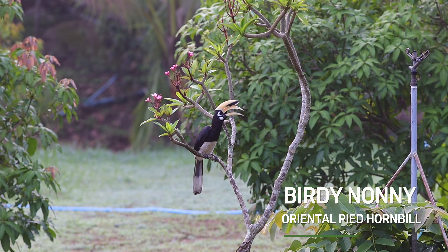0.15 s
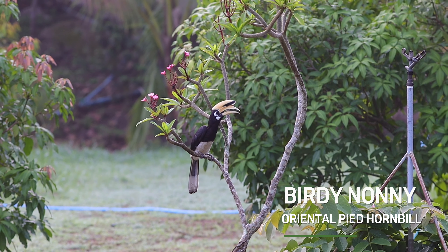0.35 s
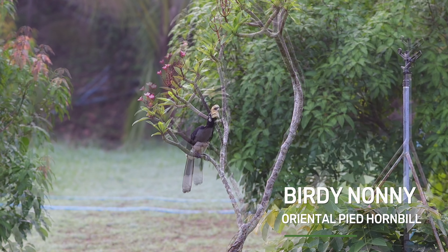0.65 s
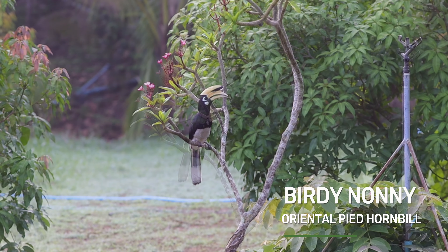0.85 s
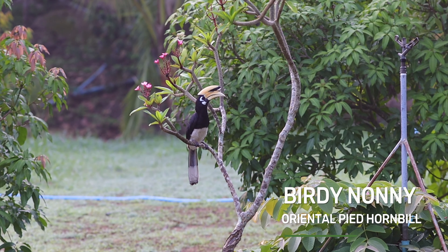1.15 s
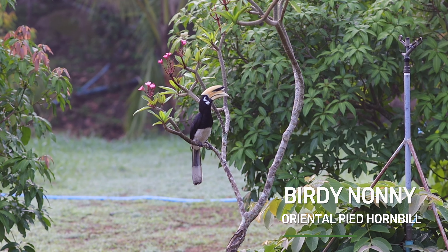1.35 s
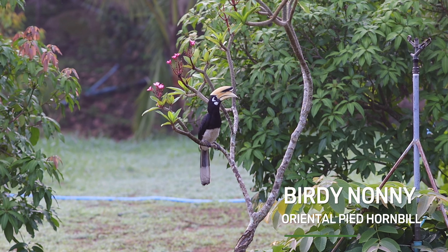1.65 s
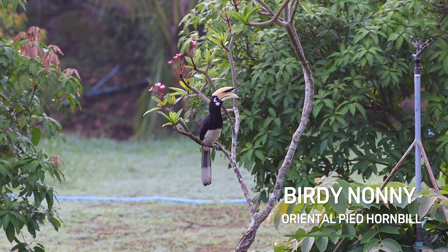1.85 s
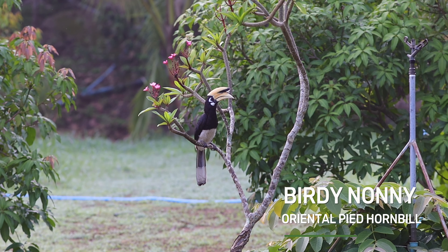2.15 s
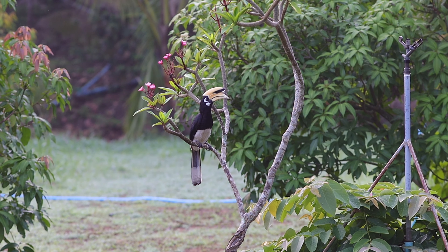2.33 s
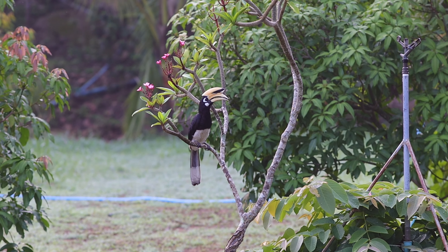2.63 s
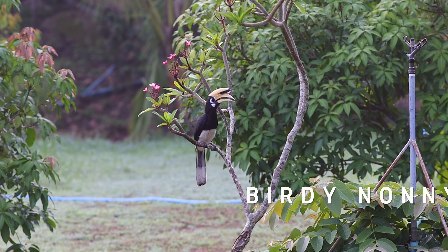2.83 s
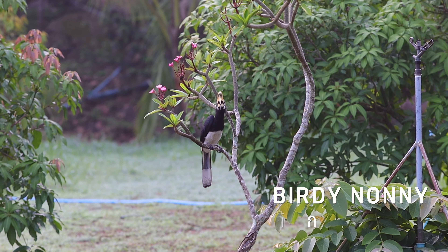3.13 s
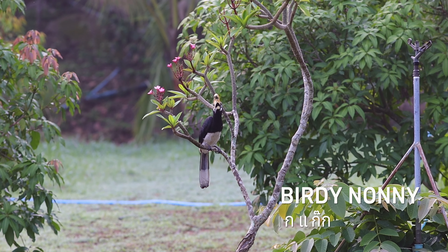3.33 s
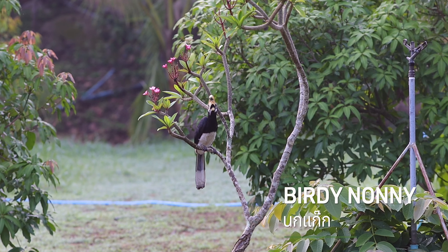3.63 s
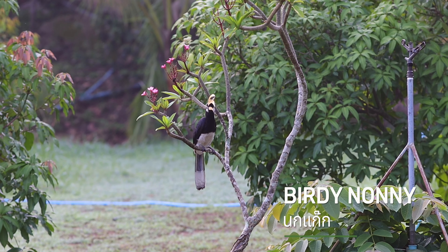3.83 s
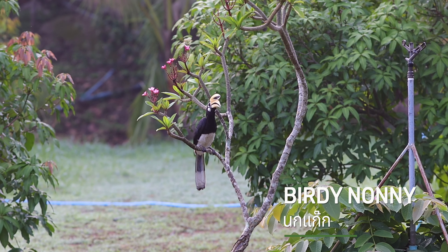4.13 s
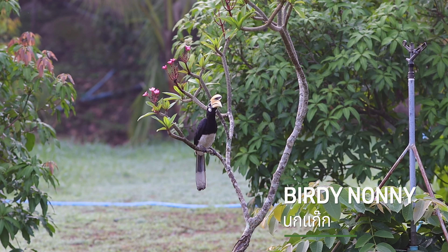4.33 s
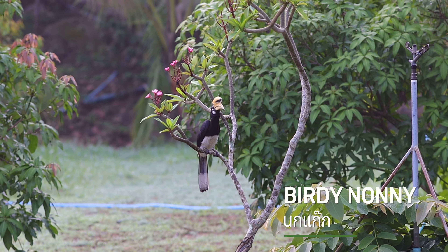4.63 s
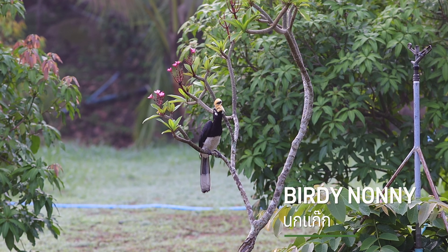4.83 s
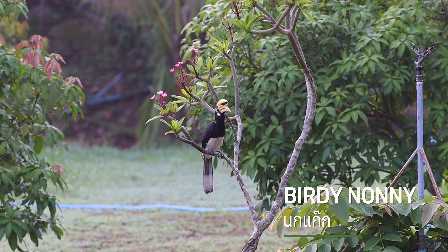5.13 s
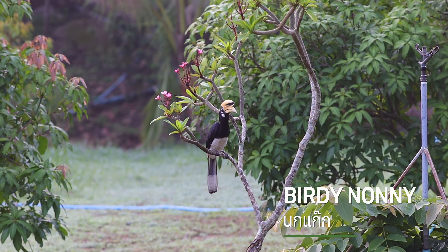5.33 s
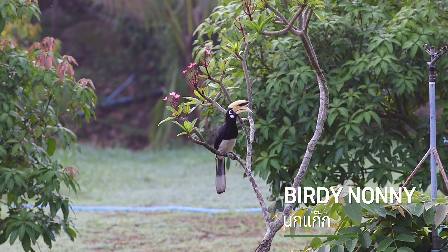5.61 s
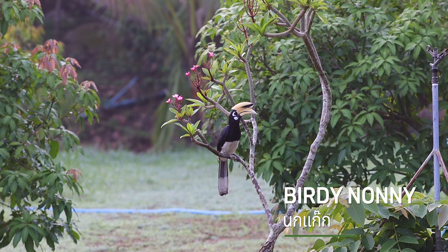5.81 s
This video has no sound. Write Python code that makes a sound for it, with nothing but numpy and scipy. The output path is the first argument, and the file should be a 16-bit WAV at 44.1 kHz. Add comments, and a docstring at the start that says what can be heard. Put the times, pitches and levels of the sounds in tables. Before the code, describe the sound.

Outdoors among trees, a large bird cackles twice: briefly at the start, then in a loud burst of about nine rough, yelping notes past the middle. The calls stand well in front, a little to the right, and echo lightly. Between and after them the microphone picks up only faint far songbirds, a few soft low hoots, rustling leaves, thin insect buzz and a low hum of machinery and traffic.

```python
"""A garden, where a hornbill cackles from a tree and snaps its bill once. Its voice is a source and a
filter: membrane pulses, shaped by throat and bill, form short arched notes that jitter, carry
subharmonics or lock into a high whistle. Walls reflect the calls and trees scatter them. Far songbirds
whistle, something hoots low, leaves rustle, insects sing and a pump hums over traffic, under a thin
high whine. Automatic gain control turns everything down while the bird is loud."""
import sys
import numpy as np
from scipy import signal
from scipy.fft import rfft, irfft, next_fast_len
from scipy.io import wavfile
from scipy.ndimage import uniform_filter1d, map_coordinates

SR = 44100
rng = np.random.default_rng(int(sys.argv[2]) if len(sys.argv) > 2 else 0)


def unload_audio(sound):
    """Save the sound as a 16-bit wav file, at the path given as the first command line argument."""
    columns = np.transpose(np.atleast_2d(sound))
    # keep every value between -1 and 1, then stretch to whole-number steps
    steps = np.round(np.clip(columns, -1, 1) * 32767)
    wavfile.write(sys.argv[1], SR, steps.astype(np.int16))


N = 263277
LEAD = 8820  # samples of room for notes that begin before time zero

# Cackle notes and one short bill snap (the 9 ms row at 0.418 s): start_s, length_s, rise_s, start_hz,
# top_hz, end_hz, first_peak_db, second_peak_db, top_roughness, pulses_per_beat, undertone_gain,
# tilt_db_per_octave
NOTES_AND_BILL_SNAP = [ (-.11, 0.065, 0.021, 1104, 1322, 1224, -17, -25.5, 0.11, 2, 0.25, 0),
                       (.063, 0.055, 0.022, 944, 1255, 1022, -21.5, -22, 0.15, 2, 0.098, -2),
                       (.23, 0.051, 0.021, 1158, 1447, 1395, -25, -23, 0.24, 3, 0.53, -1.5),
                       (0.418, 0.009, 0.0041, 1160, 1170, 1140, -34, -32, 0.36, 2, 0.14, -11),
                       (2.774, .058, 0.023, 1147, 1379, 1225, -20.5, -19.5, 0.48, 2, 0.49, -2.5),
                       (2.995, 0.065, 0.022, 1939, 2045, 1900, -16, -15.5, 0.65, 2, 0.51, -1),
                       (3.162, .064, 0.024, 923, 1277, 966, -12.5, -14, 0.16, 2, 0.44, -0.5),
                       (3.317, .057, 0.021, 975, 1265, 996, -11, -13.5, 0.09, 2, 0.68, 0.5),
                       (3.484, .061, 0.02165, 960, 1260, 983, -11.5, -13.5, 0.14, 2, 0.27, -0.5),
                       (3.65, 0.065, 0.02, 1983, 2484, 1870, -10.5, -16.5, 0.47, 2, .3, -2),
                       (3.806, 0.065, 0.022, 1986, 2453, 1881, -10.5, -15, 0.47, 2, 0.33, -0.5),
                       (3.967, 0.062, .022, 988.4, 1276, 990, -10, -15, 0.28, 2, 0.53, -1.5),
                       (4.13, .049, 0.018, 1270, 1456, 1421, -15, -16, 0.3, 3, 0.54, 0.5), ]
# Resonance of throat and bill: frequency_hz, gain_db
VOCAL_TRACT = [(500, -34.5), (1150, -25.5), (1700, -14.5), (2000, -2.5), (2350, -5), (3000, -4), (4300, -6),
               (5600, -10), (6800, -15.5), (7900, -26.5), (13500, -47), (15000, -61)]
def hornbill():
    """Source and filter: notes pass through the vocal tract and echo; the snap is made the same way."""
    track, tract = np.zeros((2, N + LEAD)), minimum_phase(VOCAL_TRACT)
    for *shape, pulses_per_beat, undertone, tilt_db in NOTES_AND_BILL_SNAP:
        sound = membrane_voice(gesture(*shape, undertone), pulses_per_beat, tilt_db, tract)
        add(track, echoes(sound, tail_db=-4.5, walls_db=2, decay_stretch=1.31), shape[0])
    return track[:, LEAD:] * amp([[-1.8], [1.8]])  # a little to the right


def membrane_voice(contours, pulses_per_beat, tilt_db, tract):
    """Subharmonic vibration: a beat every few pulses adds spectral lines between the harmonics."""
    t, hz, db, rough, undertone = contours
    size, beat = len(t), 1 / pulses_per_beat
    noise_share = np.clip(rough, 0, 1) ** 1.4
    jitter = (.005 + .03 * noise_share) * wobble(700, size)
    hz = uniform_filter1d(hz, 90) * (1 + jitter)
    phase = 2 * np.pi * np.cumsum(hz) / SR
    harmonics = np.arange(1, 15)[:, None]
    orders = np.vstack([harmonics, harmonics - 1 + beat])
    strength = np.where(orders % 1 == 0, 1, undertone) * (orders * hz < 15000)
    strength *= amp(tilt_db * np.log2(orders * hz / 2500))
    spread = rng.normal(0, 1, (len(orders), 1))  # scattered phases draw each pulse out
    strength *= amp(1.2 * np.array([wobble(90, size) for _ in orders]))  # each line flickers on its own
    pulses = np.sum(strength * np.cos(orders * phase + spread), axis=0)
    pulses *= amp(1.4 * noise_share * wobble(506, size))
    leak = .25 + (.5 + .5 * np.cos(beat * phase)) ** 2  # air escapes once a beat
    breath = rng.standard_normal(size) * leak
    voiced = [signal.fftconvolve(x, tract)[:size] for x in (pulses, breath)]
    pulses, breath = [x / np.sqrt(np.abs(uniform_filter1d(x ** 2, 260)) + 1e-12) for x in voiced]  # rms 1
    fade = np.clip((t - t[0]) / .0038, 0, 1) * np.clip((t[-1] - t) / .0099, 0, 1)
    return amp(db) * fade * (np.sqrt(1 - noise_share) * pulses + np.sqrt(noise_share) * breath)


# Vocal effort: peaks at attack (share of the rise) and swell (share of the fall);
# dips of onset_db, top_db, end_db
VOCAL_EFFORT = dict(attack=.48, swell=.45, onset_db=-10, top_db=-2, end_db=-9)
# Whistles where the pulses lock: start_s, end_s, pitch_hz, level_db
MODE_LOCKS = [(3.01, 3.04, 2120, -17.5), (3.669, 3.687, 2710, -13.5), (3.827, 3.85, 2730, -14)]
def gesture(start_s, length_s, rise_s, start_hz, top_hz, end_hz, first_db, second_db, rough, undertone):
    """Pitch is pulse rate: it arches while effort peaks twice; mode locking clears it to a whistle."""
    t = np.arange(start_s, start_s + length_s + .0045, 1 / SR)
    age, fall_s, rounding_s = t - start_s, length_s - rise_s, .0039
    rising = start_hz + (top_hz - start_hz) * np.abs(age / rise_s) ** 1.343
    falling = np.interp(age, [rise_s, rise_s + .75 * fall_s], [top_hz, end_hz])
    hz = uniform_filter1d(np.where(age < rise_s, rising, falling), round(rounding_s * SR))
    effort = VOCAL_EFFORT
    knots = [0, effort["attack"] * rise_s, rise_s, rise_s + effort["swell"] * fall_s, length_s]
    onset_db, end_db = first_db + effort["onset_db"], second_db + effort["end_db"]
    top_db = (first_db + second_db) / 2 + effort["top_db"]
    db = np.interp(age, knots, [onset_db, first_db, top_db, second_db, end_db])
    rough = np.interp(age, knots, [.8, rough + .2, rough, rough + .06, .55])
    undertone = np.interp(age - rise_s, [-rounding_s, 0], [.083, undertone])  # weak until the top
    contours = hz, db, rough, undertone
    for on_s, off_s, lock_hz, lock_db in MODE_LOCKS:
        blend = np.clip(np.minimum(t - on_s, off_s - t) / .003 + .5, 0, 1)
        locked = lock_hz - 1500 * (t - on_s), lock_db, .04, .1  # the pitch sags 1500 Hz a second
        contours = [(1 - blend) * free + blend * held for free, held in zip(contours, locked)]
    return t, *contours


# Two-note songbird phrase: offset_s, length_s, start_hz, end_hz, relative_db
SONG_PHRASE = [(0, 0.185, 1824, 1803, -1), (0.111, 0.145, 2118, 2102, -4.5)]
# Its repeats: start_s, level_db, left_minus_right_db
PHRASE_REPEATS = [(0.966, -38, -2.5), (2.585, -40.5, -5.5), (4.301, -38.5, -3.5)]
# Single whistles: start_s, length_s, start_hz, middle_hz, end_hz, level_db, left_minus_right_db
FAR_WHISTLES = [ (.885, 0.062, 1796, 1780, 1810, -43.5, -5), (1.33, 0.034, 1590, 1570, 1610, -45, -1),
                (1.658, 0.087, 1885, 1902, 1934, -41.5, 0), (1.929, 0.04, 2270, 2240, 2190, -44, -4),
                (1.996, 0.23, 3870, 3900, 3860, -49.5, -1), (2.116, 0.042, 2280, 2253, 2210, -45.5, -2),
                (2.239, 0.23, 3750, 3730, 3580, -55.5, 4), (2.462, 0.22, 2670, 2700, 2600, -50.5, -1),
                (2.507, 0.08, 3650, 3650, 3600, -60, -5), (4.525, 0.034, 1620, 1587, 1460, -47.5, -28),
                (4.679, 0.16, 2560, 1746, 2297, -44, -10.5), (5.74, 0.031, 1960, 1992, 1840, -45.5, -4)]
# Chirps and hoarse squawks: start_s, length_s, start_hz, end_hz, level_db, left_minus_right_db
FAR_CHIRPS = [(.56, 0.094, 1876, 2004, -46, -6), (1.37, 0.03, 3300, 3060, -47.5, 10),
              (1.402, 0.033, 2665, 2490, -46, 6), (1.81, 0.047, 3210, 3200, -42, 1),
              (1.847, 0.058, 2570, 2780, -49.5, -11)]
FAR_SQUAWKS = [(.459, 0.062, 2294, 2226, -38, -3), (.471, 0.057, 2620, 2870, -38, -1),
               (.639, 0.056, 2293, 2793, -37, 2), (.651, 0.078, 2710, 3080, -41.5, -5),
               (.833, .075, 2430, 2830, -37.5, 1), (.917, 0.077, 3030, 3970, -45, 2),
               (1.9, 0.069, 3000, 3200, -48, 0), (2.05, 0.11, 3300, 3000, -50, -3),
               (2.3, 0.103, 3700, 3600, -49, -2), (2.45, 0.074, 3530, 3500, -49.5, 0),
               (4.655, 0.067, 3540, 3773, -51, -11), (4.835, 0.041, 3750, 3800, -47, -8),
               (5.56, 0.09, 3350, 3630, -51.5, -2)]
# Low hoots: start_s, level_db
HOOTS = [(1.07, -46), (5.235, -50), (5.502, -56)]
HOOT_HZ, HOOT_S = 607, .085
def far_calls():
    """Random frequency modulation: the wider a tone's pitch shakes, the hoarser the call."""
    track = np.zeros((2, N + LEAD))
    phrases = [(start_s + offset_s, length_s, start_hz, end_hz, db + relative_db, pan_db)
               for start_s, db, pan_db in PHRASE_REPEATS
               for offset_s, length_s, start_hz, end_hz, relative_db in SONG_PHRASE]
    hoots = [(start_s, HOOT_S, HOOT_HZ, HOOT_HZ, db, -4) for start_s, db in HOOTS]
    for calls, shake_hz in [(glides(phrases), 14), (FAR_WHISTLES, 14), (glides(FAR_CHIRPS), 65),
                            (glides(FAR_SQUAWKS), 200), (glides(hoots), 0)]:
        for start_s, *call in calls:
            add(track, far_tone(*call, shake_hz), start_s)
    return track[:, LEAD:]


def glides(calls):
    """Linear sweep: each call gains a middle pitch halfway between its ends."""
    return [(start_s, length_s, start_hz, (start_hz + end_hz) / 2, end_hz, db, pan_db)
            for start_s, length_s, start_hz, end_hz, db, pan_db in calls]


def far_tone(length_s, start_hz, middle_hz, end_hz, db, pan_db, shake_hz):
    """Reverberant field: a far tone, bent through three pitches, arrives mostly as echoes."""
    u = np.linspace(-1, 1, round(length_s * SR))
    hz = middle_hz + (end_hz - start_hz) / 2 * u + ((start_hz + end_hz) / 2 - middle_hz) * u ** 2
    hz += (.0074 * middle_hz + shake_hz) * wobble(202.6, len(u))
    envelope = amp(4 * wobble(45, len(u))) * (1 - u ** 8)
    tone = envelope * np.sin(2 * np.pi * np.cumsum(hz) / SR)
    far = echoes(tone, tail_db=4.5, walls_db=6, decay_stretch=1, size=14000)
    far *= np.sqrt(len(u)) / np.linalg.norm(far, axis=1, keepdims=True)
    return far * amp([[db + pan_db / 2], [db - pan_db / 2]])


# Reverberation among the trees, before decay_stretch: frequency_hz, t60_s
TREE_DECAY = [(800, 1), (2500, 0.42), (6000, 0.43), (12000, 0.73)]
# Wall reflections, before walls_db: delay_s, left_db, right_db
WALL_ECHOES = [(.003, -2.5, -6), (.012, -15, -5.5), (.031, -7, -7.5), (.05, -17, -17.5),
               (.068, -15.5, -15.5)]
def echoes(x, tail_db, walls_db, decay_stretch, size=24000):
    """Reflection and scattering: walls return distinct echoes, foliage an exponentially dying tail."""
    hz, t, noise = signal.stft(rng.standard_normal((2, size)), SR, nperseg=256)
    t60_s = decay_stretch * along(TREE_DECAY, hz)[:, None]
    response = signal.istft(noise * amp(-60 * t / t60_s), SR, nperseg=256)[1]
    response *= 1 - np.exp(-np.arange(response.shape[1]) / SR / .012)  # scatter builds up
    response *= amp(tail_db) / np.linalg.norm(response[0])
    for delay_s, left_db, right_db in WALL_ECHOES:
        arrival = round(delay_s * SR) + rng.integers(0, 40, size=2)
        response[[0, 1], arrival] += amp([left_db + walls_db, right_db + walls_db])
    response[:, 0] = 1  # direct sound
    return signal.fftconvolve(x[None], response, axes=1)


# Pump tones: shaft_order, level_re_traffic_db
PUMP_ORDERS = [(2, -18.5), (3, -77), (5, -12), (6, -60), (12, -15.5), (22, -19), (23, -15), (24, -18.5),
               (25, -9.5), (26, -20.5)]
SHAFT_HZ = 48.9
def pump():
    """Rotating machinery: tones lie at whole multiples of a slightly wandering shaft rate."""
    angle = 2 * np.pi * SHAFT_HZ * np.cumsum(1 + .0007 * wobble(3)) / SR
    hum = sum(amp(db + 3 + 1.5 * wobble(6)) * np.sin(order * angle + rng.uniform(0, 2 * np.pi))
              for order, db in PUMP_ORDERS)  # a sine peaks 3 dB above its rms
    return hum * amp([[-1.2], [1.2]])


# Distant traffic and air: frequency_hz, density_db
TRAFFIC_SPECTRUM = [(18, -38), (30, -16.5), (229, -4), (424, -9), (577, -8.5), (640, -9.5), (1190, -14.5),
                    (1380, -16), (1610, -16), (1930, -16), (2500, -21), (3970, -27.5), (4750, -18.5),
                    (5990, -35), (14000, -47)]
# Level of traffic and pump together: time_s, level_db
TRAFFIC_LEVEL = [(0, -53.5), (.5, -48), (.826, -48.5), (.829, -42), (1.56, -43), (5.97, -43)]
def traffic_and_pump():
    """Tones over broadband noise: hum and rumble share one level, which steps up early on."""
    return envelope_gain(TRAFFIC_LEVEL) * (pump() + diffuse_noise(TRAFFIC_SPECTRUM, patchy_db=.34))


# Rustle: frequency_hz, density_db
LEAF_SPECTRUM = [(900, -24), (1600, -14), (2500, -9.5), (3800, -9), (5200, -22.5), (8000, -35.5),
                 (13000, -55)]
# Its course: time_s, level_db
LEAF_LEVEL = [(0, -40.5), (0.43, -42.5), (.826, -50.5), (.829, -42.5), (1.52, -48.5), (1.7, -47),
              (2.17, -46.5), (3.2, -45.5), (4.65, -44.5), (4.877, -47), (5.33, -57), (7.7, -36),
              (5.84, -72)]
def leaves():
    """Incoherent summation: countless leaf contacts merge into a patchy hiss."""
    return envelope_gain(LEAF_LEVEL) * diffuse_noise(LEAF_SPECTRUM, patchy_db=1.8)


# Insect chorus: frequency_hz, density_db
INSECT_SPECTRUM = [(4100, -14), (4500, 1.5), (4850, -3.5), (5150, -4), (5600, -35)]
# Its course: time_s, level_db
INSECT_LEVEL = [(0, -45), (0.45, -65), (.83, -55), (1.4, -51), (2.2, -52.5), (2.7, -64), (4.25, -50.5),
                (5.4, -54), (6.6, -59), (5.84, -48.5)]
def insects():
    """Narrowband noise: many singers near one pitch blur into a single band."""
    return envelope_gain(INSECT_LEVEL) * diffuse_noise(INSECT_SPECTRUM, patchy_db=1.1)


def whine(pitch_hz=15569):
    """Pure tone: faint and high, stronger on the left and in antiphase on the right."""
    return amp(-63) * np.sin(2 * np.pi * pitch_hz * np.arange(N) / SR) * np.array([[1.1], [-.3]])


# Likeness of the two channels: frequency_hz, correlation
COHERENCE = [(60, 0.97), (180, 0.93), (550, 0.913), (1650, 0.22), (4970, -0.26), (15000, -0.039)]
# Their balance: frequency_hz, left_minus_right_db
BALANCE = [(60, 0), (240, -2), (950, -2), (3770, -2.5), (15000, 0.5)]
def diffuse_noise(spectrum, patchy_db):
    """Spatial coherence: patchy stereo noise of rms 1, alike in both channels at long wavelengths."""
    def mid_side_gains(hz):
        angle = np.arccos(np.clip(along(COHERENCE, hz), -1, 1)) / 2
        return amp(along(spectrum, hz)) * [np.cos(angle), np.sin(angle)]

    cells = signal.stft(rng.standard_normal((2, N)), nperseg=512)[2]
    patches = uniform_filter1d(rng.standard_normal(cells.shape[1:]), 6, axis=0)  # across frequency
    patches = uniform_filter1d(patches, 12, axis=1)  # across time
    noise = signal.istft(cells * amp(patchy_db * unit(patches)), nperseg=512)[1][:, :N]
    mid, side = filtered(noise, mid_side_gains)
    stereo = np.array([mid + side, mid - side])
    return unit(filtered(stereo, lambda hz: amp(along(BALANCE, hz) * [[.5], [-.5]])))


def amp(db):
    """Decibels as an amplitude ratio."""
    return 10 ** (np.asarray(db) / 20)


def unit(x):
    """Normalisation to rms 1."""
    return x / np.sqrt(np.mean(x ** 2) + 1e-20)


def along(points, hz):
    """Interpolation of (frequency_hz, value) points on a log frequency axis."""
    knots_hz, values = np.transpose(points)
    return np.interp(np.log(hz + 1), np.log(knots_hz + 1), values)


def envelope_gain(points):
    """Interpolation of (time_s, level_db) points to one gain per sample."""
    return amp(np.interp(np.arange(N) / SR, *np.transpose(points)))


def wobble(rate_hz, size=N):
    """Smooth random modulation: a spline through rate_hz knots a second."""
    knots = rng.standard_normal(int(size * rate_hz / SR) + 4)
    return map_coordinates(knots, [np.arange(size) * rate_hz / SR])


def filtered(x, response):
    """Linear filtering: the spectrum of x times a frequency response."""
    size = next_fast_len(N + 8192)
    return irfft(rfft(x, size) * response(np.fft.rfftfreq(size, 1 / SR)), size)[..., :N]


def minimum_phase(points, size=1024):
    """Causal impulse response of (frequency_hz, gain_db) points, by folding the cepstrum."""
    magnitude = amp(along(points, np.fft.rfftfreq(size, 1 / SR)))
    cepstrum = irfft(np.log(magnitude + 1e-6), size)
    cepstrum[1:size // 2] *= 2
    cepstrum[size // 2 + 1:] = 0
    return irfft(np.exp(rfft(cepstrum)), size)


def add(track, sound, start_s):
    """Superposition of a sound on a track that begins LEAD samples early."""
    part = track[:, LEAD + round(start_s * SR):][:, :sound.shape[1]]
    part += sound[:, :part.shape[1]]


def scene():
    """Superposition: the pressures of all sources add at the microphone."""
    return hornbill() + far_calls() + traffic_and_pump() + leaves() + insects() + whine()


def record(dry):
    """Automatic gain control: gain falls as running power rises; soft clipping and a band limit follow."""
    memory_s, knee_db, bass_cut_hz, top_hz = .35, -20, 46, 15800
    pole = np.exp(-1 / (memory_s * SR))
    initial = [amp(-42) ** 2]  # the bird is already calling
    power = signal.lfilter([1 - pole], [1, -pole], np.mean(dry ** 2, axis=0), zi=initial)[0]
    levelled = dry * (1 + power / amp(knee_db) ** 2) ** -.3
    rounded = levelled / (1 + np.abs(levelled) ** 6) ** (1 / 6)  # the preamp rounds the highest peaks
    return filtered(rounded, lambda hz: (hz < top_hz) / np.sqrt(1 + (bass_cut_hz / (hz + 1)) ** 10))


dry = scene()
out = record(dry)
unload_audio(out)
```